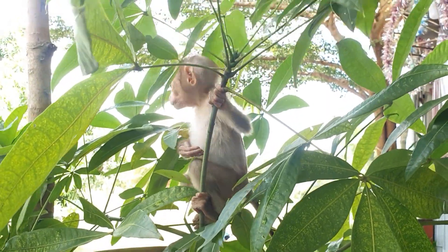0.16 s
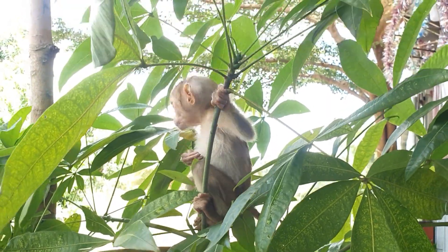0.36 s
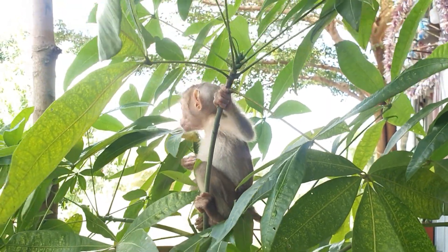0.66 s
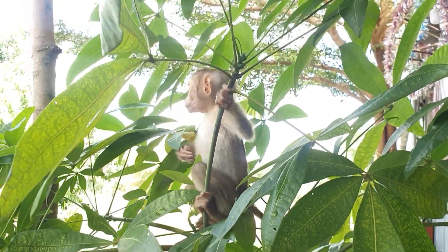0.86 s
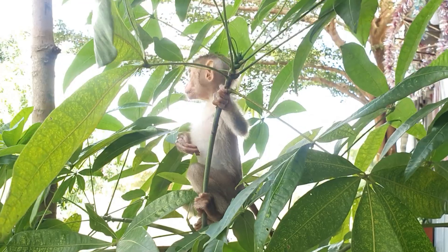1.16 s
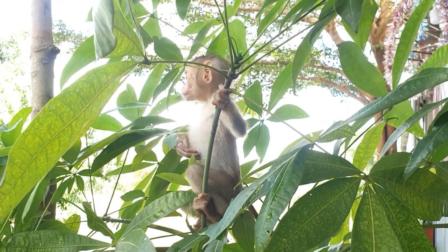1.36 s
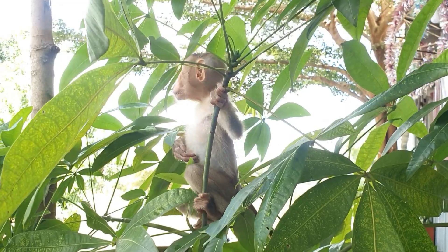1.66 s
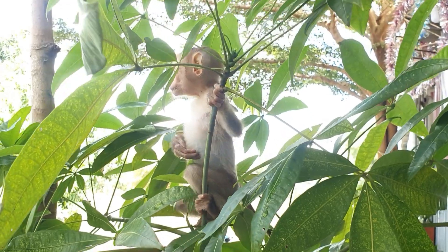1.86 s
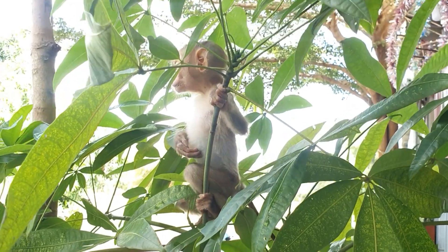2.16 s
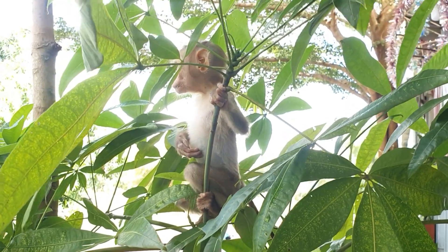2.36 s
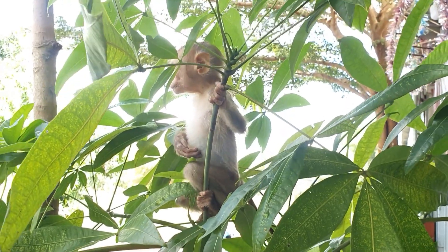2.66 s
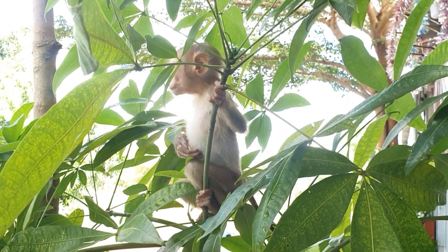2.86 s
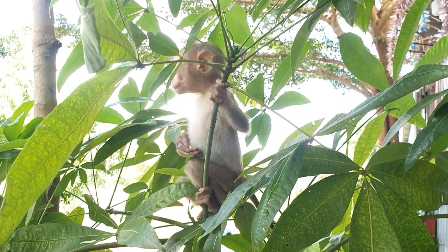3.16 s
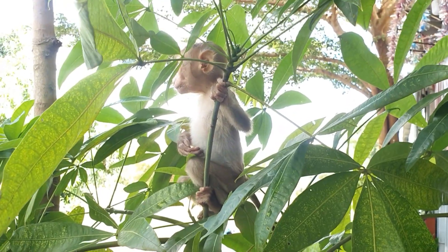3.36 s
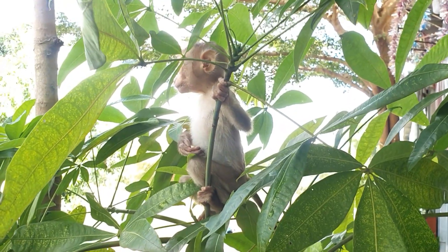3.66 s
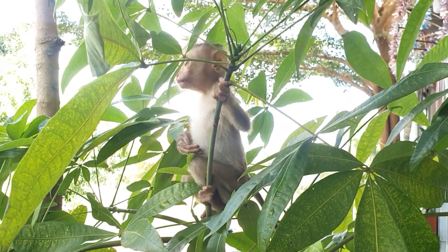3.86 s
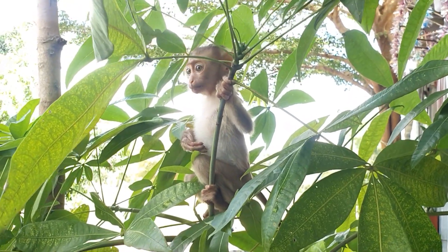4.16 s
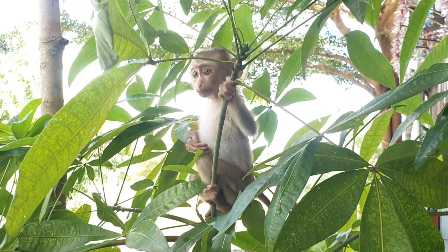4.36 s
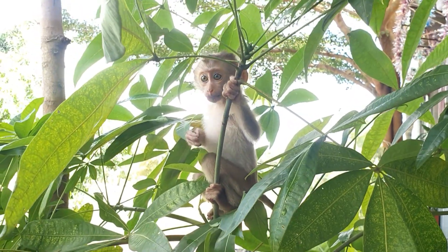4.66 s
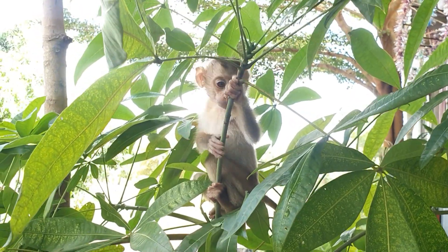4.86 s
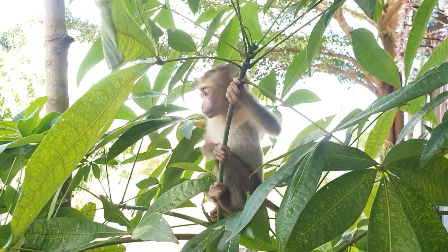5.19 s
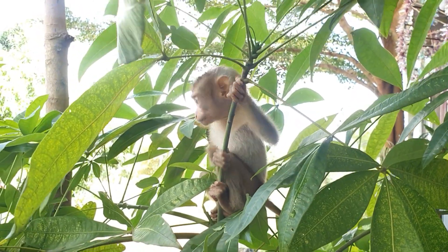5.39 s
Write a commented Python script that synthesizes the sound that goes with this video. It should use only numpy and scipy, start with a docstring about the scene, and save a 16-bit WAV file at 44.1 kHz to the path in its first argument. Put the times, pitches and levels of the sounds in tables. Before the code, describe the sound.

In a yard, a branch bumps softly, leaves brush and a bird gives quick falling chips. A young monkey close by, somewhat to the left, then screams five times: short, rising whistles that break into a rasp and echo briefly off walls. A fainter falling wail follows from further off. A low rumble, a distant idling engine and a thin, high hiss lie underneath.

```python
"""In a yard, a young monkey screams five times from a tree, and the nearby walls echo.
Each scream is a rising whistle from its vocal folds; in spells they add half-pitch tones or shake
irregularly into a rasp. Fainter coos and wails, mostly falling, come from further off.
A bird chips, leaves brush together and the branch bumps as the monkey shifts.
Behind it all, a distant engine idles with a slow throb, under a low rumble and a thin, high hiss."""
import sys
import numpy as np
from scipy import signal
from scipy.fft import rfft, irfft, next_fast_len
from scipy.io import wavfile
from scipy.ndimage import uniform_filter1d, minimum_filter1d, map_coordinates

SR = 44100
rng = np.random.default_rng(int(sys.argv[2]) if len(sys.argv) > 2 else 0)


def pcm_store(signal):
    """Save signal as 16-bit PCM."""
    levels = np.round(np.clip(np.atleast_2d(signal), -1, 1) * 32767)
    wavfile.write(sys.argv[1], SR, levels.astype(np.int16).T)


N = 243873

# Tone of the outdoor rumble: frequency_hz, gain_db
AIR_TONE = [(20, -71), (45, -2.5), (70, 0), (200, -6), (290, -7), (420, -18), (650, -22.5), (1400, -23),
            (2800, -30), (4500, -41), (8000, -43), (11000, -38), (16000, -85)]
# How alike the rumble is in the two ears (1 = the same): frequency_hz, likeness
EAR_LIKENESS = [(60, 0.93), (180, 0.99), (550, 0.68), (1650, -0.087), (4970, 0.12), (15000, -0.15)]
# Tone of the resting hiss: frequency_hz, gain_db
HISS_TONE = [(3000, -18), (7000, -7), (9000, -2), (10200, -12), (11600, 7.5), (13000, -0.5), (15000, 0),
             (16000, -10)]
# The two surges of the hiss: start_s, length_s, level_db
SURGES = [(2.2, 2.01, -39), (3.97, 0.78, -42.5)]
# Tone of those surges: frequency_hz, gain_db
SURGE_TONE = [(3000, -3), (7000, -6), (10000, -6), (11500, 1.5), (14000, 4), (16000, 2)]
# Running count of the engine's firings: time_s, count
FIRINGS = [(-.013, 0), (1.55, 15), (4.558, 44), (5.63, 54)]
# How strong the exhaust puffs are: time_s, level_db
PUFF_LEVELS = [(0, -33), (.9, -35), (1.3, -31.5), (1.8, -35.5), (3.4, -38), (4.45, -33.5), (4.8, -40.5),
               (5.5, -38.5)]
# Dull bumps on the branch: start_s, level_db, cutoff_hz, decay_s (time to fall 60 dB)
BUMPS = [(0.14, -22.5, 437, 0.026), (0.502, -25.5, 162, 0.4), (0.529, -25.5, 220, 0.069),
         (0.566, -22, 150, 0.082), (.603, -31, 282, 0.065)]
# Leaves brushing: start_s, length_s, level_db, centre_hz, width_octaves
SWISHES = [(0.092, 0.13, -51.5, 3630, 0.32), (1.128, 0.049, -52, 4570, 0.52),
           (1.533, 0.15, -46.5, 1170, 2.1), (1.534, 0.064, -47.5, 4660, 0.25),
           (1.542, .06, -47, 12600, 0.091), (1.53, 0.073, -48, 8360, 0.11), (1.851, 0.12, -49.5, 1680, 1.8),
           (3.387, 0.039, -52, 2370, 0.32), (5.066, 0.25, -56.5, 4340, 0.42), (5.266, 0.18, -56, 4050, 0.4)]
# Thin bird notes and quick falling chips: start_s, length_s, start_hz, end_hz, level_db
CHIRPS = [(0.907, 0.22, 7670, 8400, -57), (1.227, 0.023, 6230, 2690, -35.5),
          (1.319, 0.029, 6420, 2910, -37), (3.295, 0.075, 8100, 8000, -53.5),
          (4.339, 0.025, 6420, 2900, -40), (5.475, 0.078, 6500, 6900, -58)]
# Soft coos: start_s, length_s, start_hz, end_hz, level_db, brightness_db_per_octave
COOS = [(.733, .13, 1828, 1670, -38, -11), (1.005, .16, 1129, 992, -55, -19),
        (3.513, 0.033, 1507, 1514, -33, -37)]
# How the throat shapes a coo: frequency_hz, gain_db
COO_THROAT = [(1000, 3), (3700, 4.5), (5000, -22), (8000, -29)]
# Far, reedy wails: start_s, length_s, start_hz, end_hz, level_db, brightness_db_per_octave
WAILS = [(4.685, .41, 1324, 807, -39, -2), (5.505, .3, 855, 900, -48.5, 3)]
# How the throat shapes a wail: frequency_hz, gain_db
WAIL_THROAT = [(800, 5.5), (1300, -3), (2000, -15), (3600, -11), (5600, -19), (6500, -27), (8400, -15.5),
               (12000, -27)]
# Screams; the first two rows join into one: start_s, length_s, attack_s, level_db, swell_db,
# low_hz, high_hz, mid_rise_s, mouth_opening_s, brightness_db_per_octave
SCREAMS = [(1.943, 0.12, 0.045, -17, -6, 1131, 1287, 0.06, 0.057, 6),
           (2.048, .247, 0.0023, -28, 4.5, 1677, 2030, .182, 0.0033, 1.5),
           (2.419, 0.35, 0.021, -20, -2.5, 1622, 1834, 0.043, 0.05, 1),
           (2.884, 0.16, 0.017, -16, -14.5, 1505, 1838, 0.053, 0.013, 0),
           (3.577, 0.18, 0.0408, -19.5, -4.5, 1253, 1750, .042, 0.025, 2.5),
           (3.98, 0.15, 0.0423, -19.5, -9, 983.5, 1247, .045, 0.0031, -2)]
# How the throat shapes a scream: frequency_hz, gain_db
SCREAM_THROAT = [(500, 15), (850, -11), (1200, 8.5), (1800, 3), (2500, -4), (3600, 3.5), (4400, -3),
                 (4900, -0.5), (5500, -8.5), (6200, -45), (9000, -22.5), (11500, -16), (16000, -22)]
# Spells when the vocal folds repeat only every second cycle: start_s, length_s, strength (0-1)
SPLIT_SPELLS = [(2.034, 0.0208, 0.47), (2.06, 0.109, 0.11), (2.607, 0.073, 0.92), (2.924, 0.049, 0.94),
                (3.588, 0.146, .95), (4.02, 0.073, .2)]
# Spells when the vocal folds shake irregularly: start_s, length_s, strength (0-1)
RASP_SPELLS = [(1.935, 0.065, 0.95), (1.995, 0.048, 0.49), (2.033, 0.023, 0.89), (2.584, 0.022, 0.56),
               (2.672, 0.098, 0.59), (2.927, 0.0593, 0.24), (3.59, .188, 0.51), (4.008, 0.0803, 0.48),
               (4.092, .06, 0.04)]
# Tone of the rushing breath in a rasp: frequency_hz, gain_db
RASP_TONE = [(400, -1), (800, -13), (1200, -10.5), (1700, 1.5), (2100, -3.5), (2500, -2), (3000, 0),
             (4200, -2), (5400, -22), (6200, -22), (9000, -32), (12000, -20), (15800, -30)]
# Narrow bands where the mouth rings: centre_hz, width_hz, gain_db
MOUTH_RINGS = [(2490, 133, 10), (4370, 98, 6)]
# How long the yard's echo takes to fall 60 dB: frequency_hz, decay_s
ECHO_DECAY = [(200, 0.057), (1000, 0.52), (2000, 0.55), (4000, 0.57), (8000, 0.56), (15000, 0.58)]
# A caller facing away sends its treble to the walls: frequency_hz, extra_echo_db
FACING_AWAY = [(1000, 2.5), (2000, 5), (4000, 6.5), (9000, 7.5)]


def amp(db):
    """Turn decibels into a factor to multiply by."""
    return 10 ** (np.asarray(db) / 20)


def unit(x):
    """Scale a signal to an average power of 1."""
    return x / np.sqrt(np.mean(x ** 2) + 1e-20)


def along(points, hz):
    """Read a table of (frequency, value) points on a log frequency scale."""
    frequencies, values = np.transpose(points)
    return np.interp(np.log(hz + 1), np.log(frequencies + 1), values)


def wobble(rate, t):
    """A smooth random curve through `rate` points a second."""
    points = np.random.default_rng(rng.integers(2 ** 31)).standard_normal(int(len(t) * rate / SR) + 4)
    return map_coordinates(points, [np.arange(len(t)) * rate / SR])


def filtered(x, response):
    """Multiply each frequency in x by response(hz)."""
    size = x.shape[-1]
    padded = next_fast_len(size + 4096)
    return irfft(rfft(x, padded) * response(np.fft.rfftfreq(padded, 1 / SR)), padded)[..., :size]


def noise(size, response):
    """Noise with its tone shaped by response(hz), at a power of 1."""
    return unit(filtered(rng.standard_normal(N)[:size], response))


def add(track, start, sound):
    """Mix a sound in at `start` seconds."""
    room = track[max(round(start * SR), 0):][:len(sound)]
    room += sound[:len(room)]


def fades(t, length, attack, release):
    """Fade in from t = 0, hold, then fade out."""
    return np.clip(np.minimum(t / attack, (length - t) / release), 0, 1)


def glide(t, start_hz, end_hz, midway, steepness):
    """An S-shaped slide between two pitches, half done after `midway` seconds."""
    return end_hz + (start_hz - end_hz) / (1 + (t / midway) ** steepness)


def air(level_db=-42.5, drift_db_per_s=-0.62):
    """Outdoor rumble that slowly sinks; its bass is nearly the same in both ears."""
    t = np.arange(N) / SR
    spread = lambda hz: np.arccos(np.clip(along(EAR_LIKENESS, hz), -1, 1)) / 2
    tone = lambda hz: amp(along(AIR_TONE, hz)) * [np.cos(spread(hz)), np.sin(spread(hz))]
    shared, side = filtered(rng.standard_normal((2, N)), tone)
    loudness = amp(level_db + drift_db_per_s * t + wobble(11, t))
    return unit(np.array([shared + side, shared - side])) * loudness


def hiss(rest_db=-61, drift_db_per_s=-0.6, surge_db_per_s=-8, edge_s=0.25, left_db=-2.0):
    """A thin, high hiss stays faint; each surge rises, sinks slowly and stops."""
    t = np.arange(N) / SR
    fizz = lambda tone: np.array([noise(N, lambda hz: amp(along(tone, hz))) for ear in range(2)])
    surges = sum(amp(db + surge_db_per_s * (t - start)) * fades(t - start, length, edge_s, edge_s)
                 for start, length, db in SURGES)
    rest = amp(rest_db + drift_db_per_s * t)
    return (rest * fizz(HISS_TONE) + surges * fizz(SURGE_TONE)) * amp(left_db * np.array([[.5], [-.5]]))


def engine(ring_hz=245, width_s=0.0047):
    """Each firing is one short, low puff of the exhaust."""
    out, t = np.zeros(N), np.arange(-SR // 40, SR // 40) / SR
    times, counts = np.transpose(FIRINGS)
    for when in np.interp(np.arange(1, counts[-1]), counts, times):
        extra_db, detune, phase = rng.standard_normal(3)
        pitch = ring_hz * (1 + 0.076 * detune)
        puff = np.exp(-(t / width_s) ** 2) * np.sin(2 * np.pi * pitch * t + phase)
        db = np.interp(when, *np.transpose(PUFF_LEVELS))
        add(out, when + t[0], amp(db + extra_db) * puff)
    return out


def bumps(lowest_hz=55, attack_s=0.0039):
    """Soft, low knocks as the monkey shifts on its branch."""
    out, t = np.zeros(N), np.arange(SR // 3) / SR
    bass_cut = lambda hz: hz ** 4 / (hz ** 4 + lowest_hz ** 4)
    for start, db, cutoff_hz, decay_s in BUMPS:
        thud = noise(len(t), lambda hz: bass_cut(hz) / (1 + (hz / cutoff_hz) ** 3.05))
        add(out, start, thud * amp(db - 60 * t / decay_s) * (1 - np.exp(-t / attack_s)))
    return out


def leaves(grain_db=3):
    """One leaf slides over another: a quick, grainy swish."""
    out = np.zeros(N)
    for start, length, db, centre_hz, octaves in SWISHES:
        t = np.arange(0, 3 * length, 1 / SR)
        swish = noise(len(t), lambda hz: np.exp(-.5 * (np.log2((hz + 1) / centre_hz) / octaves) ** 2))
        grainy = unit(swish * amp(grain_db * wobble(479, t)))
        age = 2.65 * t / length  # the swish is loudest at age 1
        add(out, start, amp(db) * age * np.exp((1 - age ** 2) / 2) * grainy)
    return out


def bird(buzz=0.035, scrape=.07):
    """High, sliding notes that start quickly; the wider the slide, the more it scrapes."""
    out = np.zeros(N)
    for start, length, start_hz, end_hz, db in CHIRPS:
        t = np.arange(0, length, 1 / SR)
        jitter = buzz + scrape * abs(np.log(start_hz / end_hz))
        pitch = np.geomspace(start_hz, end_hz, len(t)) * (1 + jitter * wobble(1545, t))
        loudness = amp(db) * np.sin(np.pi * (t / length) ** .65)
        add(out, start, loudness * np.sin(2 * np.pi * np.cumsum(pitch) / SR))
    return out


def overtones(t, phase, pitch, throat, multiples, db_per_octave, flicker_db):
    """Vocal folds make tones at multiples of the pitch; the throat shapes them, and they flicker."""
    out = np.zeros(len(t))
    for k in multiples:
        db = along(throat, k * pitch) + db_per_octave * np.log2(max(k, 1))
        flicker = flicker_db * min(k / 3, 1) * wobble(89.1, t)
        out += amp(db + flicker) * np.sin(k * phase)
    return out


def soft_calls(calls, throat, quaver, flicker_db, attack_s, release_s, fade_db,
               onset_db_per_octave, settle_s, midway_share, steepness):
    """Sliding, quavering calls; each fades, and its brightness settles as the mouth takes its shape."""
    out = np.zeros(N)
    for start, length, start_hz, end_hz, db, settled_brightness in calls:
        t = np.arange(0, length, 1 / SR)
        pitch = glide(t, start_hz, end_hz, midway_share * length, steepness)
        phase = 2 * np.pi * np.cumsum(pitch * (1 + quaver * wobble(260, t))) / SR
        brightness = settled_brightness + onset_db_per_octave * np.exp(-t / settle_s)
        voice = overtones(t, phase, pitch, throat, np.arange(1, 8), brightness, flicker_db)
        add(out, start, amp(db + fade_db * t / length) * fades(t, length, attack_s, release_s) * voice)
    return out


def spells(rows, t, least, slip_s=0.016):
    """How broken the voice is, from `least` up to 1, as it slips in and out of each spell."""
    depth = sum(strength * fades(t - start + slip_s / 2, length + slip_s, slip_s, slip_s)
                for start, length, strength in rows)
    return np.clip(depth, least, 1)


def rasp(phase, treble_db, cutoff_hz=3200):
    """Rushing air gets through once a cycle; an open mouth lets out more of its treble."""
    breath = noise(len(phase), lambda hz: amp(along(RASP_TONE, hz)))
    dull = filtered(breath, lambda hz: 1 / (1 + (hz / cutoff_hz) ** 6))
    return (dull + amp(treble_db) * (breath - dull)) * (1 + 0.49 * np.cos(phase))


def scream(row, split_db=2, split_sag=.042, shut_db_per_octave=-18, closing_s=0.025):
    """The pitch dips, then climbs as the mouth opens; the vocal folds whistle, split or rasp."""
    start, length, attack, db, swell_db, low_hz, high_hz, mid_rise, opening, open_brightness = row
    t = np.arange(0, length, 1 / SR)
    split = spells(SPLIT_SPELLS, start + t, least=0.025)
    rough = spells(RASP_SPELLS, start + t, least=0.021)
    broken = np.maximum(split, rough)  # a broken voice is a little duller and weaker
    scoop = 6.79 * np.maximum(.48 * attack - t, 0)  # the short slide down at the start
    pitch = glide(t, low_hz, high_hz, mid_rise, steepness=4.99) * (1 + scoop - split_sag * split)
    shut = np.exp(-t / opening) + np.exp((t - length) / closing_s)
    brightness = open_brightness + shut_db_per_octave * shut - 0.5 * broken
    loudness = amp(db + swell_db * t / length - 1.5 * broken) * fades(t, length, attack, release=0.015)
    jitter = .0055 * wobble(420, t) + .09 * rough ** 2 * wobble(650, t)
    phase = 2 * np.pi * np.cumsum(pitch * (1 + jitter)) / SR
    whistle = overtones(t, phase, pitch, SCREAM_THROAT, np.arange(1, 10), brightness - 5, flicker_db=2.5)
    halves = overtones(t, phase, pitch, SCREAM_THROAT, np.arange(9) + .5, brightness - 1.2, flicker_db=3)
    tone = (whistle + amp(split_db) * split * halves) / np.sqrt(1 + 2 * split ** 2)
    voice = np.sqrt(1 - rough ** 2) * tone + rough * rasp(phase, brightness)
    shudder = amp(2 * rough * wobble(298.5, t))
    return loudness * shudder * voice


def monkey(bass_cut_hz=790, leak_db=-17):
    """The screams carry little bass and ring in two shrill bands."""
    out = np.zeros(N)
    for row in SCREAMS:
        add(out, row[0], scream(row))
    bass_cut = lambda hz: 1 - (1 - amp(leak_db)) / (1 + (hz / bass_cut_hz) ** 10)
    band = lambda hz, centre, width: 1j * hz * width / (centre ** 2 - hz ** 2 + 1j * hz * width)
    ringing = lambda hz: 1 + sum((amp(db) - 1) * band(hz, centre, width)
                                 for centre, width, db in MOUTH_RINGS)
    return filtered(out, lambda hz: bass_cut(hz) * ringing(hz))


def yard(x, echo_db, left_db, echo_left_db, build_s=0.0026, lag_s=.00008):
    """The direct sound reaches the left ear slightly late; wall echoes build up and die, bass first."""
    hz, t, spectrum = signal.stft(rng.standard_normal((2, SR)), SR, nperseg=256)
    decay = amp(-60 * t / along(ECHO_DECAY, hz)[:, None])
    tail = signal.istft(spectrum * decay * (1 - np.exp(-t / build_s)), SR, nperseg=256)[1]
    echo = signal.fftconvolve(x[None], tail / np.linalg.norm(tail[0]), axes=1)[:, :N]
    echo = filtered(echo, lambda hz: amp(along(FACING_AWAY, hz) / 2))
    sides = np.array([[.5], [-.5]])  # left, right
    delay = lambda hz: np.exp(-2j * np.pi * hz * lag_s * sides)
    direct = filtered(x, lambda hz: amp(-along(FACING_AWAY, hz) / 2) * delay(hz))
    return direct * amp(left_db * sides) + echo * amp(echo_db + echo_left_db * sides)


def scene():
    """Near screams, far calls, leaves and the bird echo in the yard, over the background."""
    near = yard(monkey(), echo_db=-2, left_db=7.5, echo_left_db=5.5)
    coos = soft_calls(COOS, COO_THROAT, quaver=.014, flicker_db=3.5,
                      attack_s=.025, release_s=0.0063, fade_db=-6.5,
                      onset_db_per_octave=10, settle_s=0.048, midway_share=.45, steepness=6.4)
    wails = soft_calls(WAILS, WAIL_THROAT, quaver=0.0148, flicker_db=7.0,
                       attack_s=.012, release_s=0.065, fade_db=-21,
                       onset_db_per_octave=-12, settle_s=0.043, midway_share=0.33, steepness=2.3)
    far = yard(coos + wails, echo_db=-2, left_db=7, echo_left_db=5.5)
    treetop = yard(leaves() + bird(), echo_db=-8, left_db=3, echo_left_db=3)
    background = bumps() + engine() + air() + hiss()
    return near + far + treetop + background * amp([[.6], [-.6]])


def record(dry, ceiling=.6, top_hz=15800):
    """A limiter turns down any peaks over the ceiling; the very highest treble is cut off."""
    hold = SR // 80
    needed = ceiling / np.maximum(np.abs(dry).max(axis=0), ceiling)
    gain = uniform_filter1d(minimum_filter1d(needed, 2 * hold), hold)
    return filtered(dry * gain, lambda hz: hz < top_hz)


dry = scene()
out = record(dry)
pcm_store(out)
```